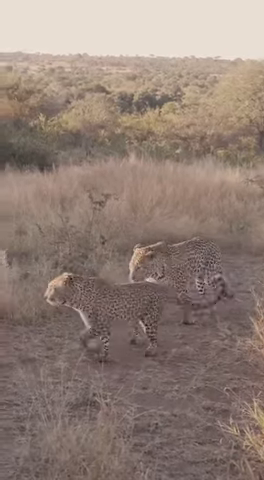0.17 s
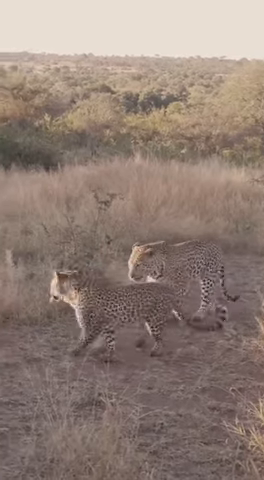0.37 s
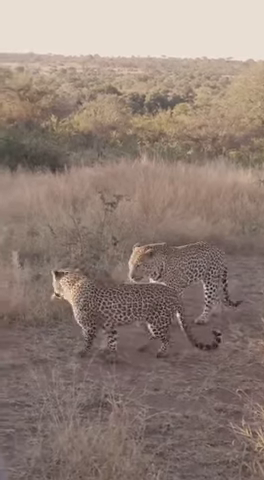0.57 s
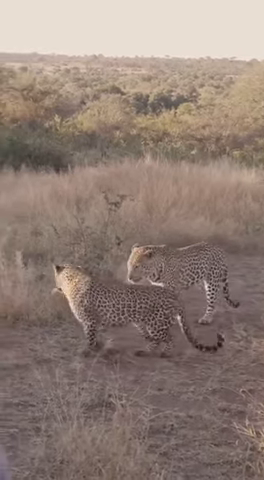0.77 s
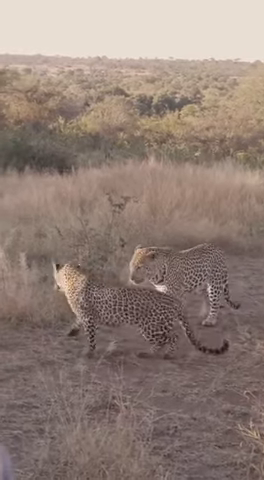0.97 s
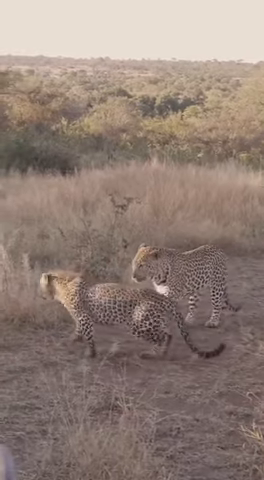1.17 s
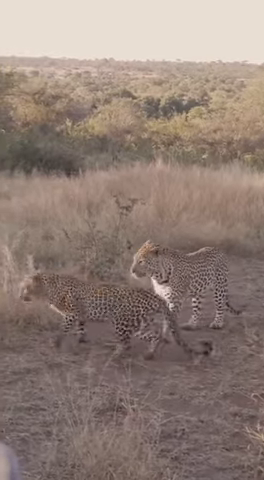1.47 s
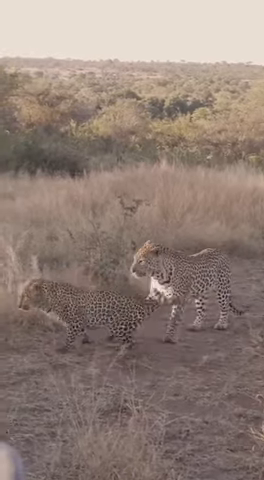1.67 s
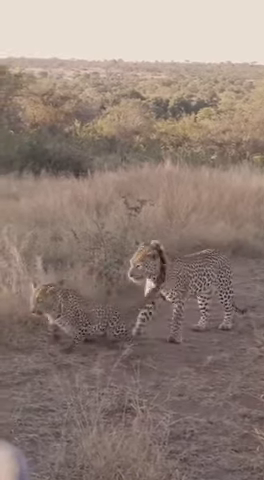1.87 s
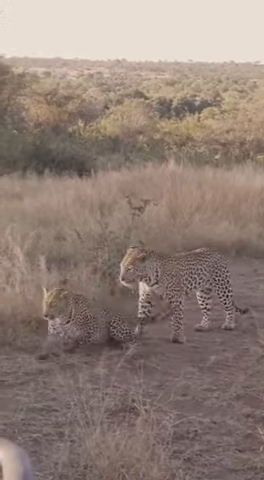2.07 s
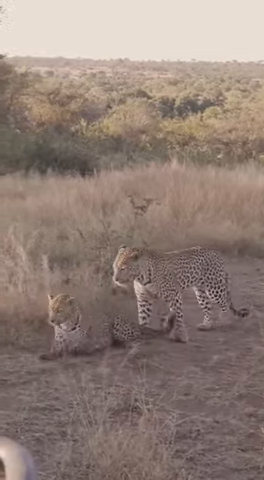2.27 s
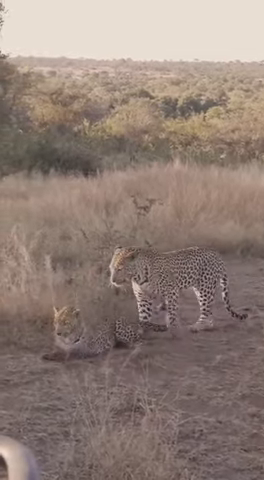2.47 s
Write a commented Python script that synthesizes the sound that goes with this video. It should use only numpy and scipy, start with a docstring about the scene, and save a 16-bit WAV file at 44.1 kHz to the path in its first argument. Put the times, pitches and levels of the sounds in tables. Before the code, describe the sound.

A leopard's low, chesty growl flutters unevenly from the start to about 1 s, each pulse a soft thud with rasping air. A quick, tighter grunt comes near 1.15 s, a brief pulse at 1.4, then stronger growling from 1.55 to the end. Birds chirp throughout, with clear whistles near 1 and 1.3 s. Grass rustles faintly around 1.2-1.6 s; air hisses, and wind bumps the microphone at 2.5 s.

```python
"""A leopard growls in open bush: slow, uneven flaps of the larynx excite the resonances of chest and
throat, each with a puff of rasping air, and one deeper grunt falls between the growls.
Birds whistle and chirp as gliding sine tones, with noise-like echoes from leaves and scrub.
Grass and twigs rustle as swelling bands of noise; coloured noise makes the hiss of the open air
and the low rumble of a breeze on the microphone."""
import sys
import numpy as np
from scipy import signal
from scipy.fft import rfft, irfft
from scipy.io import wavfile
from scipy.ndimage import uniform_filter1d

SR = 44100
rng = np.random.default_rng(int(sys.argv[2]) if len(sys.argv) > 2 else 0)


def to_wav(sig):
    """Store sig (one row per channel, or 1-D mono) as 16-bit WAV at the path in sys.argv[1].

    Samples outside -1..1 are clipped; the rate is SR.
    """
    pcm = np.clip(np.atleast_2d(sig), -1, 1) * 32767
    pcm = np.round(pcm).astype(np.int16)
    wavfile.write(sys.argv[1], SR, pcm.T)  # frames by channels


N = 115542  # length in samples

# Hiss of the open air. Each row: frequency in Hz, relative density in dB per Hz.
AIR_COLOUR = [(30, -5.5), (90, 1), (180, -4), (300, -8.5), (420, -6), (600, -3), (850, -10), (1400, -11),
              (2200, -15), (3400, -20.5), (4100, -22.5), (4800, -31), (6500, -31.5), (9000, -34),
              (13000, -34.5)]
AIR_DB = -46
# Strength of the wind on the microphone. Each row: time in seconds, level in dB before WIND_DB.
WIND_LEVEL = [(0, -34), (.16, -28), (.24, -38.5), (.6, -35), (.87, -29), (1.11, -45.5), (1.39, -35.5),
              (1.71, -43), (2.11, -35.5), (2.42, -48), (2.49, -29), (2.62, -27)]
# Spectrum of the wind rumble. Each row: frequency in Hz, relative density in dB per Hz.
WIND_COLOUR = [(3, -29), (7, -2.5), (11, -0.5), (20, 2.5), (38, -17.5), (60, -30), (100, -47), (400, -77)]
WIND_DB = 0.5
# A low bump on the microphone. One row: start in seconds, length in seconds, centre in Hz,
# half-width in octaves, level in dB.
BUMP = (2.5, 0.5, 45, .5, -24)
# Grass brushed and twigs trodden. Each row: start in seconds, length in seconds, centre in Hz,
# half-width in octaves, level in dB.
RUSTLES = [(0.734, 0.034, 4870, .16, -55), (1.22, 0.42, 1900, 0.7, -48), (1.544, 0.16, 4500, 1.4, -62.5),
           (1.843, 0.009, 830, 0.68, -35.5), (2.45, 0.044, 4760, 0.13, -55)]

# Clear whistles, one curve each. Each row: time in seconds, pitch in Hz, level in dB.
WHISTLES = [
    [(.81, 1847, -54), (.906, 1806, -47), (.956, 1803, -36.5), (1.012, 1770, -37), (1.034, 1823, -35),
     (1.055, 1955, -44), (1.075, 2152, -44)],
    [(1.165, 5380, -66), (1.245, 4550, -69), (1.268, 4310, -51), (1.32, 4040, -43), (1.35, 3980, -53.5),
     (1.396, 3920, -50), (1.42, 3890, -66)],
    [(.49, 2194, -63), (.505, 2250, -41), (.55, 2320, -51), (.575, 2600, -43), (.6, 2610, -52)],
    [(1.595, 1258, -48.5), (1.712, 1305, -45.5), (1.73, 1300, -63)],
    [(1.655, 2660, -53), (1.685, 2693, -50.5), (1.86, 2655, -48.5)],
]
# Bird chirps. Each row: start in seconds, length in seconds, first, middle and last pitch in Hz,
# level in dB before BIRD_DB or LEAVES_DB.
CHIRPS = [(0, 0.029, 3420, 3120, 2850, -60), (.01, 0.066, 5200, 5270, 4750, -71),
          (0.046, 0.063, 2476, 2500, 2140, -52), (0.073, 0.058, 3610, 3760, 3740, -59.5),
          (.22, 0.088, 5150, 5120, 4900, -74), (0.253, 0.097, 3330, 3520, 3850, -55.5),
          (.355, 0.051, 4900, 5130, 5440, -67.5), (0.389, 0.033, 2120, 2267, 2360, -50),
          (.41, 0.034, 2084, 1760, 1600, -52), (0.419, 0.14, 3200, 3280, 3390, -53),
          (0.424, 0.047, 3400, 3750, 3950, -54), (0.457, .07, 3580, 3680, 3860, -51),
          (0.464, 0.026, 2660, 2510, 2300, -57), (0.557, 0.1, 3500, 3774, 3813, -55.5),
          (.74, 0.069, 3080, 3210, 3200, -52.5), (0.751, 0.044, 3440, 3790, 4070, -56),
          (0.779, 0.039, 1960, 2210, 2350, -51), (0.871, 0.021, 2700, 2430, 2200, -54),
          (0.917, 0.045, 2130, 2300, 2410, -45), (0.918, 0.1, 3200, 3620, 4160, -55.5),
          (0.995, 0.11, 3203, 3327, 3295, -57.5), (1.09, 0.037, 3310, 3460, 3360, -51),
          (1.202, 0.054, 3300, 3600, 4150, -52.5), (1.526, .05, 3514, 3203, 3050, -51.5),
          (1.547, 0.044, 1670, 1620, 1810, -50), (1.546, 0.028, 1970, 1985, 2120, -52),
          (1.575, 0.059, 1900, 2028, 2480, -45), (1.599, 0.12, 3100, 3280, 3480, -51.5),
          (1.606, 0.062, 4980, 5150, 5330, -65.5), (1.707, .045, 1986, 1740, 1560, -49.5),
          (1.705, 0.12, 3230, 3130, 3050, -52.5), (1.938, 0.1, 2713, 2824, 3150, -53),
          (2.003, 0.036, 2837, 2827, 2580, -50), (2.113, 0.077, 3810, 3650, 3434, -57),
          (2.397, 0.035, 3170, 3226, 2920, -49), (2.488, 0.034, 3220, 3390, 3040, -53.5)]
BIRD_DB = 0.5
WHISTLE_WARBLE, CHIRP_WARBLE = 0.0034, 0.0098  # rms pitch wander, as a fraction of the pitch
CHORUS_DB, CHORUS_HZ = -57.5, 3048  # level ahead of the leaves, central pitch
CHORUS_SPREAD, CHORUS_GLIDE = 0.13, 0.13  # in log pitch; as a fraction of the pitch
LEAVES_DB, LEAVES_T60_S = -5, 0.093
SCRUB_DB, SCRUB_T60_S = -10.5, 0.82

# Larynx in the growls, one curve each. Each row: time in seconds, flaps per second,
# level in dB before GROWL_DB.
GROWL_FLAPS = [
    [(0.044, 28, -19.5), (0.106, 18.07, -21), (0.286, 15.63, -26.0), (0.414, 20, -24.5),
     (0.436, 30.4, -20.5), (0.53, 38.8, -21.5), (0.551, 13.8, -25), (0.744, 22.2, -22.5), (0.809, 44, -24),
     (0.831, 13.0, -23.5), (0.97, 16, -27.0)],
    [(1.088, 30, -33), (1.11, 30, -36)],
    [(1.354, 17.3, -21), (1.42, 16.5, -39.5)],
    [(1.527, 30, -33.5), (1.55, 30, -35)],
    [(1.555, 39.1, -13.5), (1.613, 52.2, -27.5), (1.641, 21.6, -16.5), (1.804, 16.27, -24.5),
     (1.851, 26.75, -17.5), (1.969, 17.2, -22.5), (2.026, 22.2, -21.5), (2.104, 10.36, -31),
     (2.125, 33.7, -16), (2.173, 16.9, -27.5), (2.26, 31.4, -16.5)],
    [(2.377, 23.95, -22), (2.444, 16.6, -14.5), (2.498, 21.65, -20), (2.6, 15.6, -15.5)],
]
# Larynx in the grunt. Each row: time in seconds, flaps per second, level in dB before GRUNT_DB.
GRUNT_FLAPS = [(1.136, 21, -24.5), (1.165, 73.3, -20.5), (1.2, 50.3, -18.5)]
# Response of chest and throat to one growl flap. Each row: frequency in Hz, relative gain in dB.
GROWL_THROAT = [(20, -56), (45, -10.5), (82, -4.5), (112, -7), (138, -4), (162, -1.5), (178, 2),
                (200, -1.5), (228, -13.5), (290, -22), (370, -30), (700, -49.5), (1500, -68), (6000, -98)]
# Response of chest and throat to one grunt flap. Each row: frequency in Hz, relative gain in dB.
GRUNT_THROAT = [(20, -35), (60, -1.5), (85, 5.5), (125, -1.5), (175, 1.5), (230, -12.5), (280, -22.5),
                (315, -6.5), (380, -32), (800, -34.5), (1500, -59), (6000, -88)]
# Air forced through by a growl flap. Each row: frequency in Hz, relative density in dB per Hz.
GROWL_RASP = [(100, 7.5), (280, 4), (550, 0), (800, -6.5), (1400, -12), (2500, -10), (5000, -27),
              (12000, -39.5)]
# Air forced through by a grunt flap. Each row: frequency in Hz, relative density in dB per Hz.
GRUNT_RASP = [(150, 1), (400, 6.5), (900, -17), (1330, 10.5), (1700, -5), (2200, 1.5), (3500, -9),
              (6000, -30), (12000, -30)]
GROWL_DB, GRUNT_DB = 3.5, 3
GROWL_RASP_DB, GRUNT_RASP_DB = -22, -20.5  # relative to the flap's thud
RASP_RISE_S, RASP_DECAY_S = 0.00087, 0.012  # time constants of one puff
# Spread from flap to flap: strength in dB, throat outline in dB, log of the resonance pitch.
STRENGTH_SCATTER_DB, COLOUR_SCATTER_DB, THROAT_SCATTER = 1.02, 1.98, 0.037
GRUNT_TIGHTENS_PER_S = 4.0  # climb of the throat's resonances, in log pitch per second

TOP_HZ = 12900


def undb(db):
    """An amplitude ratio is ten to the power of its decibels over twenty."""
    return 10 ** (np.asarray(db) / 20)


def unit(x):
    """Division by the root mean square gives a signal of rms 1."""
    return x / np.sqrt(np.mean(x ** 2))


def gains(points, size):
    """A spectral outline in dB is interpolated over log frequency into gains on an FFT grid."""
    hz, db = np.array(points, float).T
    grid_hz = np.arange(size // 2 + 1) * SR / size
    return undb(np.interp(np.log(grid_hz + 1), np.log(hz), db))  # + 1 avoids log of zero


def noise(points):
    """Filtering white noise in the frequency domain gives coloured noise, here of rms 1."""
    spectrum = rfft(rng.standard_normal(N))
    return unit(irfft(spectrum * gains(points, N), N))


def ring(points, size=8192):
    """Folding the cepstrum gives a causal, minimum-phase response to an impulse, here of peak 1."""
    cepstrum = irfft(np.log(gains(points, size)))
    cepstrum[1:size // 2] *= 2
    cepstrum[size // 2 + 1:] = 0
    response = irfft(np.exp(rfft(cepstrum)))[:size // 2]
    return response / np.abs(response).max()


def walk(rate):
    """Random steps, `rate` per second, are averaged twice into a smooth wander of rms about 1."""
    k = int(SR / rate)
    steps = np.repeat(rng.standard_normal(N // k + 1), k)
    smooth = uniform_filter1d(uniform_filter1d(steps, k), k)
    return unit(smooth)[:N]


def add(out, start, sound):
    """Sounds superpose linearly: one is summed in from a start in seconds."""
    i = min(max(int(start * SR), 0), N)
    out[i:i + len(sound)] += sound[:N - i]


def scatter(x, t60):
    """Dense echoes from vegetation act as decaying noise of unit energy, convolved with the sound."""
    t = np.arange(SR // 2) / SR
    decay = np.exp(-np.log(1000) * t / t60)
    build_up = 1 - np.exp(-t / (0.013 * t60))
    echoes = rng.standard_normal(len(t)) * decay * build_up
    return signal.fftconvolve(x, echoes / np.linalg.norm(echoes))[:N]


def swell(at, length, hz, octaves, db):
    """Broadband friction or impact is a band of noise whose envelope rises and falls once."""
    out, n = np.zeros(N), int(length * SR)
    colour = [(hz / 8 ** octaves, -35), (hz / 2 ** octaves, -4), (hz, 0),
              (hz * 2 ** octaves, -4), (hz * 8 ** octaves, -35), (hz * 64 ** octaves, -90)]
    add(out, at, undb(db) * noise(colour)[:n] * np.hanning(n))
    return out


def breeze():
    """Wind on the microphone is low-frequency noise of varying level, under the hiss of open air."""
    s, db = np.array(WIND_LEVEL).T
    wind_db = WIND_DB + np.interp(np.arange(N) / SR, s, db)
    buffet = noise(WIND_COLOUR) * undb(wind_db)
    air = noise(AIR_COLOUR) * undb(AIR_DB + 0.55 * walk(6.01))  # wanders by 0.55 dB rms
    return buffet + swell(*BUMP) + air


def grass():
    """Friction of dry grass and twigs radiates brief swells of noise."""
    return sum(swell(*row) for row in RUSTLES)


def tone(hz, warble, fade):
    """A whistle is a sine whose phase integrates an unsteady pitch; rms 1 between its soft ends."""
    hz = hz * (1 + warble * walk(300)[:len(hz)])
    phase = 2 * np.pi * np.cumsum(hz) / SR
    return np.sqrt(2) * np.sin(phase) * signal.windows.tukey(len(hz), fade)


def chirp(length, first, middle, last):
    """A chirp is frequency modulation along a parabola through three pitches."""
    u = np.linspace(0, 1, int(length * SR))
    bend = np.polyfit([0, .5, 1], [first, middle, last], 2)
    return tone(np.polyval(bend, u), CHIRP_WARBLE, fade=0.44)


def clear_whistles():
    """Each long whistle follows a curve of pitch and a curve of level."""
    out = np.zeros(N)
    for curve in WHISTLES:
        s, hz, db = np.array(curve, float).T
        t = np.arange(s[0], s[-1], 1 / SR)
        whistle = tone(np.interp(t, s, hz), WHISTLE_WARBLE, fade=0.046)
        add(out, s[0], whistle * undb(np.interp(t, s, db)))
    return out


def far_chorus():
    """Many chirps at random times and pitches superpose into a chorus of rms 1."""
    out = np.zeros(N)
    for when, long, shift_a, shift_b, bend_in, bend_out in rng.uniform(-1, 1, size=(170, 6)):
        hz = CHORUS_HZ * np.exp(CHORUS_SPREAD * (shift_a + shift_b))
        first, last = hz * (1 + CHORUS_GLIDE * bend_in), hz * (1 + CHORUS_GLIDE * bend_out)
        add(out, (when + 1) / 2 * N / SR, chirp(0.03835 * 2 ** long, first, hz, last))
    return unit(out)


def birds():
    """Leaves blur the chirps and the far chorus by short echoes; the scrub echoes all the song."""
    whistles, chirps = clear_whistles(), np.zeros(N)
    for at, length, first, middle, last, db in CHIRPS:
        add(chirps, at, undb(db) * chirp(length, first, middle, last))
    blurred = scatter(undb(LEAVES_DB) * chirps + undb(CHORUS_DB) * far_chorus(), LEAVES_T60_S)
    song = whistles + undb(BIRD_DB) * chirps + blurred
    return song + undb(SCRUB_DB) * scatter(song, SCRUB_T60_S)


def larynx(curve, throat, rasp, rasp_db, tightens=0):
    """Source and filter: each flap is an impulse ringing the throat, and gates turbulent air."""
    s, rate, db = np.array(curve, float).T
    t = np.arange(s[0], s[-1], 1 / SR)
    phase = np.cumsum(np.interp(t, s, rate)) / SR
    flaps = np.interp(np.arange(int(phase[-1]) + 1), phase, t)  # one flap per whole cycle
    hz, outline = np.array(throat, float).T
    i = np.arange(SR // 10)
    puff = np.exp(-i / SR / RASP_DECAY_S) * (1 - np.exp(-i / SR / RASP_RISE_S))
    body, air = np.zeros(N), np.zeros(N)
    variations = rng.standard_normal(size=(64, 2 + len(hz)))
    for at, (loud, tight, *colour) in zip(flaps, variations):
        thud = ring(np.c_[hz, outline + COLOUR_SCATTER_DB * np.array(colour)])
        strength = undb(np.interp(at, s, db) + STRENGTH_SCATTER_DB * loud)
        # reading the response faster raises all its resonances
        pitch = np.exp(THROAT_SCATTER * tight + tightens * (at - s.mean()))
        add(body, at, strength * np.interp(i * pitch, np.arange(len(thud)), thud, right=0))
        add(air, at, strength * puff)
    return body + undb(rasp_db) * air * noise(rasp)


def leopard():
    """Growls and grunt share one mechanism but differ in throat resonance, rasp and flap rate."""
    growls = sum(larynx(curve, GROWL_THROAT, GROWL_RASP, GROWL_RASP_DB) for curve in GROWL_FLAPS)
    grunt = larynx(GRUNT_FLAPS, GRUNT_THROAT, GRUNT_RASP, GRUNT_RASP_DB, GRUNT_TIGHTENS_PER_S)
    return undb(GROWL_DB) * growls + undb(GRUNT_DB) * grunt


def scene():
    """Sound pressures of breeze, grass, birds and leopard add at one microphone."""
    return (breeze() + grass() + birds() + leopard())[None, :]


def record(dry):
    """A steep elliptic low-pass filter cuts the top of the spectrum."""
    low_pass = signal.ellip(10, .2, 80, TOP_HZ, fs=SR, output="sos")
    return signal.sosfilt(low_pass, dry)


dry = scene()
out = record(dry)
to_wav(out)
```